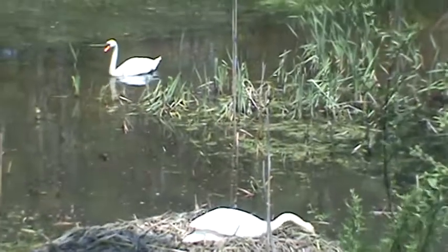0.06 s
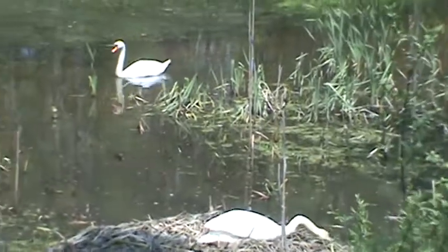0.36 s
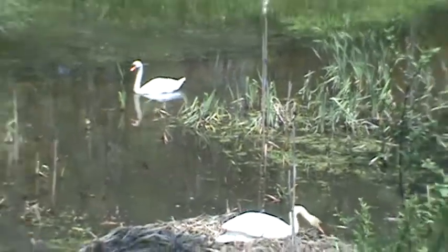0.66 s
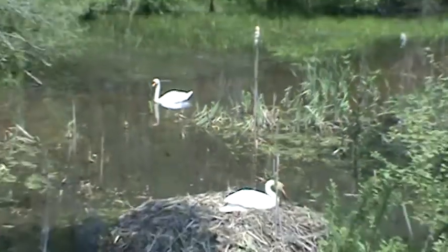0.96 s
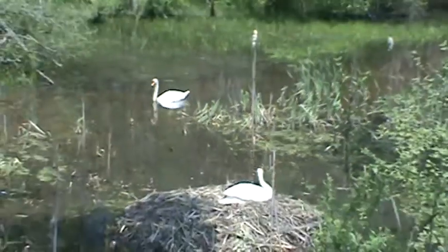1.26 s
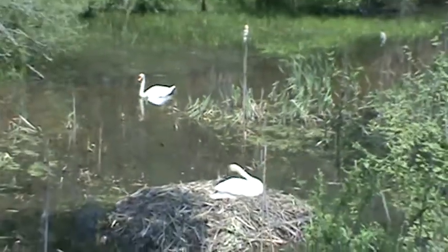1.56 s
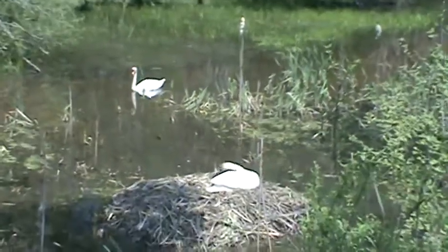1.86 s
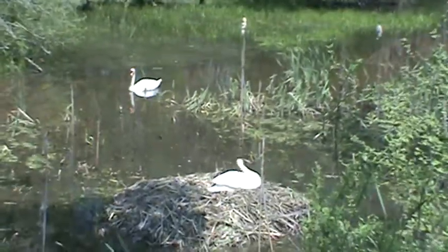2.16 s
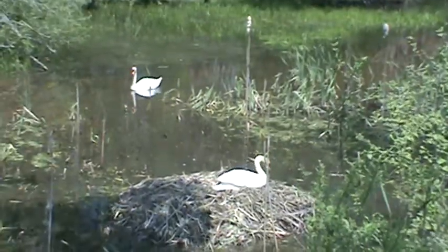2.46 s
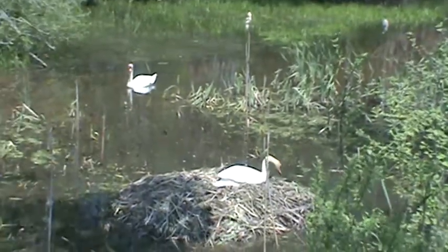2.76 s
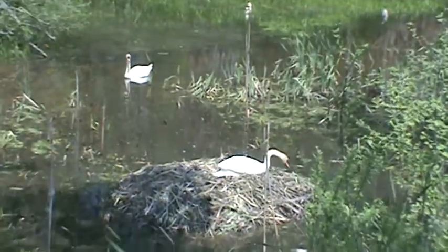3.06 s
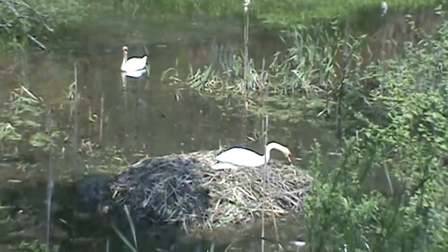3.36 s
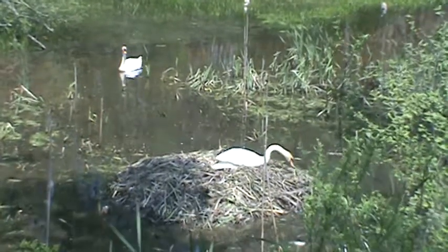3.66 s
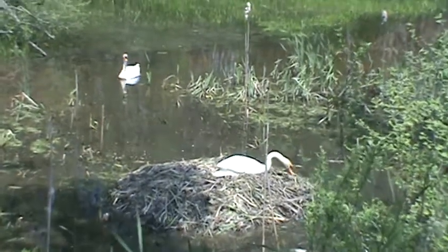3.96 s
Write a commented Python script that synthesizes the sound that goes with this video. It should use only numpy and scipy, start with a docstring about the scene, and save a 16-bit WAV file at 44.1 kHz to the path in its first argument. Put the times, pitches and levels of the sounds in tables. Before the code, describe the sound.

Small birds chirp and whistle over a low wind rumble and a few frog croaks.

```python
"""Reedy pond in light wind

From the bank, on a hand-held camera's stereo microphone. Far off, a songbird warbles for two seconds;
then a nearer one whistles a high, slurred song. Others chip and whistle, and a frog's pulses ring its
throat sac in short croaks. Reeds and bushes scatter the calls. The breeze rustles the leaves and
rumbles on the microphone, and the camera hums and ticks faintly."""
import sys
import numpy as np
from scipy import signal
from scipy.fft import rfft, irfft, next_fast_len
from scipy.io import wavfile
from scipy.ndimage import uniform_filter1d, map_coordinates

SR = 44100
rng = np.random.default_rng(int(sys.argv[2]) if len(sys.argv) > 2 else 0)


def master_out(mix):
    """Clip the mix to full scale and print it as 16-bit PCM to the path in sys.argv[1]."""
    frames = np.transpose(np.atleast_2d(mix))
    ceiling = np.clip(frames, -1, 1)
    pcm = np.round(ceiling * 32767).astype(np.int16)
    wavfile.write(sys.argv[1], SR, pcm)


N = 176400

# Camera motor's hum and whine: f/Hz, level/dB
MOTOR_TONES = [(92, -46.5), (12300, -79)]
# Ticks of the camera body and jolts of air on the microphone: t/s, level/dB
BODY_TICKS = [(.257, -45), (.461, -37.5), (0.904, -40), (2.87, -37)]
AIR_JOLTS = [(.0595, -13), (.074, -21), (2.981, -22), (3.011, -23)]
# Course of the zoom's whirr, the leaves' hiss and the wind's buffeting: t/s, level/dB
ZOOM_LEVEL = [(0, -73), (.25, -66), (.9, -61.5), (1.2, -83), (1.7, -66), (2.2, -79)]
LEAF_LEVEL = [(0, -51), (.8, -49), (1.35, -53.5), (1.7, -54), (2.1, -54.5), (4, -58.5)]
BUFFET_LEVEL = [(0, -20.5), (.35, -28.5), (.68, -34.5), (.77, -29), (1.0, -31.5), (1.45, -41.5), (2.9, -43),
                (3.2, -36.5), (4, -42.5)]
# Noise spectra of ticks, one brighter click, open air, leaves and buffeting: f/Hz, relative level/dB
TICK_SPECTRUM = [(2000, -23), (5000, 0.5), (7000, 7), (10000, -9), (15000, -24)]
CLICK_SPECTRUM = [(3000, -8), (7000, 6), (10500, 0), (13000, -14), (15500, -7)]
AIR_SPECTRUM = [(100, -10), (135, 4.5), (168, -4), (215, -2.5), (275, -9), (380, -9), (600, -10.5),
                (850, -6.5), (1100, -11.5), (1600, -15.5), (2400, -23.5), (3200, -25), (4000, -28.5),
                (7500, -31.5), (11000, -38), (15500, -40.5)]
LEAF_SPECTRUM = [(600, -5.5), (1400, 5), (2200, 0.5), (6500, -0.5), (8400, -10.5), (15000, -30)]
BUFFET_SPECTRUM = [(13, -36), (22, -2.5), (43, -1.5), (87, -1.5), (257, -19), (293, -19.5), (351, -26),
                   (500, -29.5), (650, -62), (1100, -120)]
# Likeness of left and right for open air and buffeting: f/Hz, correlation
AIR_CORRELATION = [(130, 0.57), (250, 1), (550, 0.7), (1200, 0.39), (3000, 0.38), (12000, 0.68)]
BUFFET_CORRELATION = [(25, .9), (60, .55), (120, -.15), (400, .1)]
# Far warbler's clear notes: t/s, length/s, start f/Hz, middle f/Hz, end f/Hz, level/dB
WARBLE_NOTES = [(0.137, 0.048, 2640, 2380, 2600, -50), (0.147, 0.032, 3010, 3190, 3100, -48),
                (0.181, 0.041, 2740, 2880, 2840, -41.5), (0.282, 0.027, 3110, 3290, 3050, -46.5),
                (0.303, 0.037, 3200, 2936, 2780, -41.5), (0.341, 0.053, 2810, 3220, 3310, -43.5),
                (0.419, 0.044, 3300, 3250, 2940, -46.5), (0.468, 0.023, 3480, 3140, 3020, -42),
                (0.494, 0.021, 3540, 3730, 3400, -45.5), (0.514, 0.027, 3310, 3090, 3600, -41.5),
                (.544, 0.018, 3250, 3026, 3180, -45), (.574, .026, 3250, 2996, 3080, -45.5),
                (.702, 0.011, 5000, 4880, 4700, -44), (.721, 0.033, 4370, 4280, 3860, -42.5),
                (0.746, 0.058, 3820, 3670, 3790, -39.5), (.898, 0.078, 3000, 3490, 2860, -45),
                (1.016, 0.058, 2776, 2550, 2220, -48), (1.093, .088, 2790, 3003, 2910, -40.5),
                (1.259, 0.037, 3396, 3330, 2760, -40.5), (1.313, 0.036, 2785, 2817, 2760, -45.5),
                (1.433, 0.05, 2330, 2544, 2300, -45), (1.553, 0.043, 2830, 3054, 2770, -40),
                (1.612, 0.03, 2780, 2570, 2500, -45), (1.702, 0.027, 3410, 3580, 3870, -43.5),
                (1.73, 0.024, 3213, 3004, 3400, -43), (1.77, .028, 2970, 3350, 3500, -45.5),
                (1.802, .03, 3015, 3390, 3620, -44.5), (2.351, 0.032, 3220, 3080, 2960, -48.5),
                (3.553, 0.034, 2300, 2250, 2300, -52.5)]
# Far raspy notes, and thin whistles, most of them farther off (the one at 3.198 s closes the near bird's first
# swoop): t/s, length/s, start f/Hz, end f/Hz, level/dB
RASP_NOTES = [(.672, .07, 4190, 4700, -44), (0.697, 0.1, 3300, 2510, -50.5),
              (0.789, 0.084, 3910, 3850, -49), (1.019, 0.075, 5940, 5390, -47.5),
              (1.145, 0.1, 4370, 4370, -51.5), (1.512, 0.049, 2850, 3185, -44),
              (1.556, 0.112, 7030, 6770, -58), (1.641, .21, 3106, 3346, -48),
              (2.301, 0.038, 3240, 2610, -49), (2.497, 0.088, 3220, 3100, -47)]
THIN_WHISTLES = [(0, 0.016, 4260, 4240, -43.5), (0.087, 0.035, 4230, 4150, -48.5),
                 (.11, 0.47, 4226, 4090, -56.5), (.6, .055, 6560, 6520, -59), (0.67, 0.15, 7540, 7700, -56),
                 (1.02, .065, 7980, 7960, -59), (1.662, .06, 6350, 6450, -58.5),
                 (1.789, 0.026, 6380, 6460, -54), (1.873, 0.063, 6470, 6520, -52.5),
                 (2.165, .058, 8700, 7750, -68), (2.322, 0.068, 8150, 7660, -69),
                 (2.53, .07, 7800, 7150, -61.5), (2.939, 0.044, 5050, 5110, -52),
                 (3.198, 0.025, 4950, 5000, -49), (3.5, 0.049, 2830, 2846, -53),
                 (3.699, 0.058, 2840, 2804, -54)]
# Frog's pulses: t/s, level/dB, throat f/Hz
FROG_PULSES = [(.006, -25.5, 1220), (0.026, -27, 1180), (0.037, -32, 1210), (0.039, -28, 1160),
               (0.0796, -19, 1142), (0.218, -32.5, 1170), (.832, -30.5, 1300), (1.818, -32.5, 1165),
               (1.833, -32, 1200), (1.839, -30.5, 1100), (1.909, -26, 1277), (2.1322, -22.5, 1202),
               (2.216, -35.5, 1230), (2.8398, -23.5, 1130), (2.8715, -17.5, 1150), (2.911, -19.5, 1134)]
# Near bird's three syllables and a second bird's chip: t/s from onset, f/Hz, relative level/dB
SWOOP_SHAPE = [(0, 8300, -23), (.016, 7200, -12), (.03, 6900, -7), (.04, 6950, -14), (.048, 7850, -11),
               (.058, 7220, -6), (.073, 5750, 1), (.086, 4250, -6), (.104, 4720, 0), (.12, 4880, -1),
               (.128, 4950, -18)]
RISE_SHAPE = [(0, 4900, -12), (.015, 4650, -5), (.031, 4100, -5), (.04, 4450, -9), (.048, 5300, -2),
              (.064, 5650, 0), (.078, 6250, -1), (.095, 6370, 1), (.106, 6330, -6), (.128, 6280, -8),
              (.136, 6280, -22)]
FALL_SHAPE = [(0, 7900, -15), (.015, 7200, -7), (.029, 6050, 1), (.046, 5250, -1), (.073, 4330, -4),
              (.092, 3780, -7), (.102, 3700, -22)]
CHIP_SHAPE = [(0, 5850, -12), (.009, 6200, -3), (.02, 5700, 0), (.03, 4500, 0), (.036, 3500, -10)]
# When each is sung: t/s, level/dB, pitch ratio
SWOOP_CALLS = [(3.041, -42.5, 1.03), (3.233, -37, 1.003), (3.427, -36, 1.005)]
RISE_CALLS = [(3.597, -37, .985), (3.741, -36.5, 1.005)]
FALL_CALLS = [(3.884, -39.5, 1.0)]
CHIP_CALLS = [(1.827, -47, 1.03), (2.624, -52, 0.94), (3.356, -43, .99)]


def amp(db):
    """Decibels to gain."""
    return 10 ** (np.asarray(db) / 20)


def unit_rms(x):
    """Scale to rms 1."""
    return x / np.sqrt(np.mean(x ** 2) + 1e-20)


def over_frequency(points, hz):
    """Read (f/Hz, value) points on a log axis."""
    f, values = np.transpose(points)
    return np.interp(np.log(hz + 1), np.log(f + 1), values)


def over_time(points):
    """Spread (t/s, value) points to one value per sample."""
    return np.interp(np.arange(N) / SR, *np.transpose(points))


def wobble(rate, n=N):
    """A smooth random curve, rate knots a second."""
    knots = rng.standard_normal(int(n * rate / SR) + 4)
    return map_coordinates(knots, [np.arange(n) * rate / SR])


def filtered(x, response):
    """Shape x by a gain that depends on frequency."""
    size = next_fast_len(N + SR // 2)
    return irfft(rfft(x, size) * response(np.fft.rfftfreq(size, 1 / SR)), size)[..., :N]


def add(out, s, x):
    """Mix x into out at s seconds."""
    i = max(0, round(s * SR))
    out[:, i:i + x.shape[-1]] += x[..., :N - i]


def stereo_noise(spectrum, correlation):
    """Coloured noise of rms 1 with a given left-right correlation."""
    def mid_side_gains(hz):
        angle = np.arccos(np.clip(over_frequency(correlation, hz), -1, 1)) / 2
        return amp(over_frequency(spectrum, hz)) * [np.cos(angle), np.sin(angle)]
    mid, side = filtered(rng.standard_normal((2, N)), mid_side_gains)
    return unit_rms(np.array([mid + side, mid - side]))


def camera(zoom_hz=9520, half_width_hz=430, click_s=.2005):
    """Right at the microphone: faint motor hum, the zoom's whirr, body ticks and one brighter click."""
    t = np.arange(N) / SR
    hum = sum(np.sqrt(2) * amp(db) * np.sin(2 * np.pi * hz * t + .5 * wobble(6.8))
              for hz, db in MOTOR_TONES)
    whirr = filtered(rng.standard_normal(N), lambda hz: 1 / (1 + ((hz - zoom_hz) / half_width_hz) ** 2))
    click_envelope = amp(-41.5) * (t > click_s) * np.exp(-abs(t - click_s) / .003)
    click = click_envelope * stereo_noise(CLICK_SPECTRUM, [(1000, .95)])
    zoom = amp(over_time(ZOOM_LEVEL) + 2.2 * wobble(49.3)) * unit_rms(whirr)
    tick_envelope = sum(amp(db) * (t > s) * np.exp(-abs(t - s) / .0033) for s, db in BODY_TICKS)
    ticks = tick_envelope * stereo_noise(TICK_SPECTRUM, [(1000, .93)])
    return hum + click + zoom + ticks


def wind(gust_db=1.6, jolt_s=.0053):
    """Gusts buffet the microphone, with a few single jolts, over open air and rustling leaves."""
    buffet = amp(over_time(BUFFET_LEVEL) + gust_db * wobble(16))
    rumble = buffet * stereo_noise(BUFFET_SPECTRUM, BUFFET_CORRELATION)
    t = np.arange(-SR // 50, SR // 50) / SR
    u = t / jolt_s
    jolt = (u ** 2 - 1) * np.exp(-u ** 2 / 2)  # a pressure dip between two small crests
    for s, db in AIR_JOLTS:
        add(rumble, s + t[0], amp(db) * jolt)
    rustle = amp(over_time(LEAF_LEVEL) + 2.1 * wobble(25.52))
    leaves = rustle * stereo_noise(LEAF_SPECTRUM, [(1000, .95)])
    air = amp(-41 + .77 * wobble(4.26)) * stereo_noise(AIR_SPECTRUM, AIR_CORRELATION)
    return (rumble + leaves + air) * amp([[-.4], [.4]])


def foliage(x, wet_db, t60, late_db, width, pan_db, late_t60=1.0):
    """Direct sound, quick scatter from the reeds and a longer tail from the trees; +pan_db is left."""
    t = np.arange(SR * 2 // 3) / SR
    mid, side = rng.standard_normal((2, len(t)))
    decay = amp(-60 * t / t60) + amp(late_db - 60 * t / late_t60)
    build_up = 1 - np.exp(-t / .0083)
    response = np.array([mid + width * side, mid - width * side]) * decay * build_up
    response *= amp(wet_db) / np.linalg.norm(response[0])
    response[:, 0] += 1  # the direct path
    heard = signal.fftconvolve(x[None], response, axes=1) / np.hypot(1, amp(wet_db))
    return heard * amp([[pan_db / 2], [-pan_db / 2]])


def whistle(hz, gain, waver, flutter_db):
    """A bird's nearly pure tone, unsteady in pitch (waver, a fraction) and in level."""
    pitch = hz * (1 + waver * wobble(800, len(hz)))
    phase = 2 * np.pi * np.cumsum(pitch) / SR
    return np.sqrt(2) * gain * amp(flutter_db * wobble(154, len(hz))) * np.sin(phase)


def slur(length, pitches, waver):
    """A short note bent through two or three pitches."""
    progress = np.linspace(0, 1, int(length * SR))
    bend = np.polyfit(np.linspace(0, 1, len(pitches)), pitches, len(pitches) - 1)
    envelope = signal.windows.tukey(len(progress), .3)
    return whistle(np.polyval(bend, progress), envelope, waver, flutter_db=1.5)


def rasp(length, pitches, db):
    """A distant note, roughened by a wide waver and more scattered than direct."""
    note = amp(db) * slur(length, pitches, waver=.05)
    return foliage(note, wet_db=4, t60=.077, late_db=-10, width=.26, pan_db=1)


def far_birds(echo_s=.02, echo_db=-10):
    """Through the bushes: a warbler's clear and raspy notes, and thin whistles, most of them farther off."""
    out = np.zeros((2, N))
    for s, length, *pitches, db in WARBLE_NOTES:
        note = amp(db) * slur(length, pitches, waver=.014)
        add(out, s, foliage(note, wet_db=-2.5, t60=.063, late_db=-14, width=.32, pan_db=-2.5))
        add(out, s + echo_s, rasp(length, pitches, db + echo_db))  # blurred echo from the trees
    for s, length, *pitches, db in RASP_NOTES:
        add(out, s, rasp(length, pitches, db))
    for s, length, *pitches, db in THIN_WHISTLES:
        note = amp(db) * slur(length, pitches, waver=.0054)
        add(out, s, foliage(note, wet_db=-7, t60=.14, late_db=0, width=.21, pan_db=0))
    return out


def frog(rise_s=.0009, decay_s=.0029, overtone_db=-14.5, echo_s=.0112, echo_db=-12.5):
    """A little to the right, each pulse rings the throat sac for a few cycles and echoes off the bank."""
    out = np.zeros((2, N))
    t = np.arange(SR // 25) / SR
    ring = (1 - np.exp(-t / rise_s)) ** 2 * np.exp(-t / decay_s)
    for s, db, hz in FROG_PULSES:
        phase = 2 * np.pi * hz * t + np.array([[0], [1.15]])  # the right channel leads
        throat = np.sin(phase) + amp(overtone_db) * np.sin(2 * phase)
        pulse = amp(db) * ring / ring.max() * throat * amp([[-2], [1]])
        add(out, s, pulse)
        add(out, s + echo_s, foliage(amp(echo_db) * pulse[1], wet_db=-14, t60=.15,
                                     late_db=-29, late_t60=.4, width=.98, pan_db=2))
    return out


def syllable(shape, ratio):
    """One whistled syllable, gliding smoothly along its pitch and level contour."""
    s, hz, db = np.transpose(shape)
    t = np.arange(int(s[-1] * SR)) / SR
    pitch = uniform_filter1d(np.interp(t, s, hz), size=220) * ratio
    envelope = amp(np.interp(t, s, db)) * signal.windows.tukey(len(t), .08)
    return whistle(pitch, envelope, waver=.005, flutter_db=2)


def chipping_bird():
    """In the open, a little to the left: three quick falling chips."""
    out = np.zeros((2, N))
    for s, db, ratio in CHIP_CALLS:
        chip = amp(db) * syllable(CHIP_SHAPE, ratio)
        add(out, s, foliage(chip, wet_db=-7, t60=.1, late_db=-18, late_t60=.5, width=.3, pan_db=2))
    return out


def near_bird(echo_s=.0135, echo_db=-5):
    """Nearby on the right: three swoops, two rising slurs and a fall, each echoed by the reed bed."""
    out = np.zeros((2, N))
    for shape, calls in (SWOOP_SHAPE, SWOOP_CALLS), (RISE_SHAPE, RISE_CALLS), (FALL_SHAPE, FALL_CALLS):
        for s, db, ratio in calls:
            call = amp(db) * syllable(shape, ratio)
            add(out, s, foliage(call, wet_db=-4.8, t60=.1, late_db=-10, width=.13, pan_db=-3.5))
            add(out, s + echo_s, foliage(amp(echo_db) * call, wet_db=3, t60=.07,
                                         late_db=-20, late_t60=.77, width=.23, pan_db=2))
    return out


def scene():
    """The pond as it reaches the microphone."""
    return near_bird() + chipping_bird() + far_birds() + frog() + wind() + camera()


def record(dry):
    """The camera keeps nothing above 15.8 kHz."""
    return filtered(dry, lambda hz: hz < 15800)


dry = scene()
out = record(dry)
master_out(out)
```